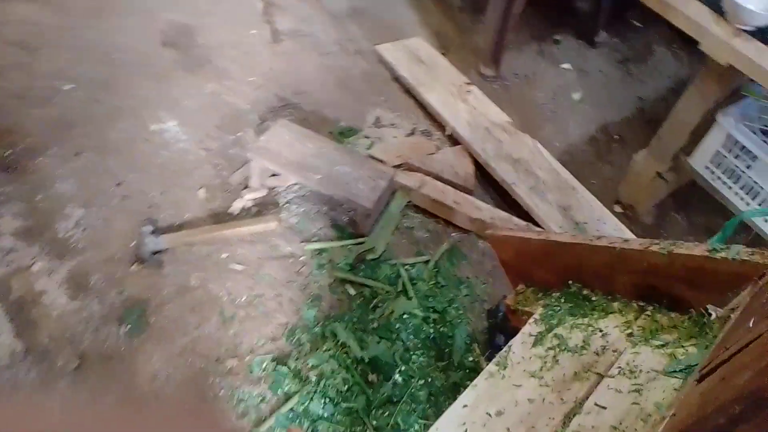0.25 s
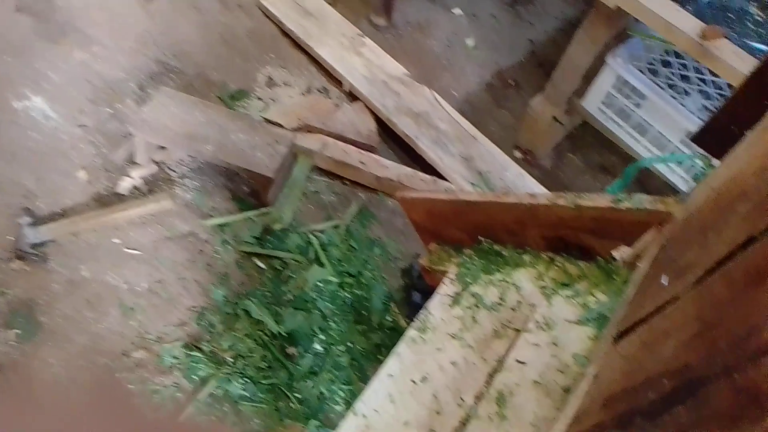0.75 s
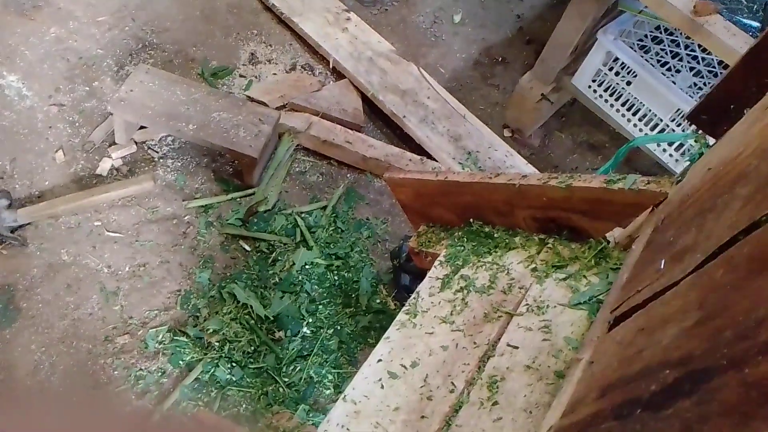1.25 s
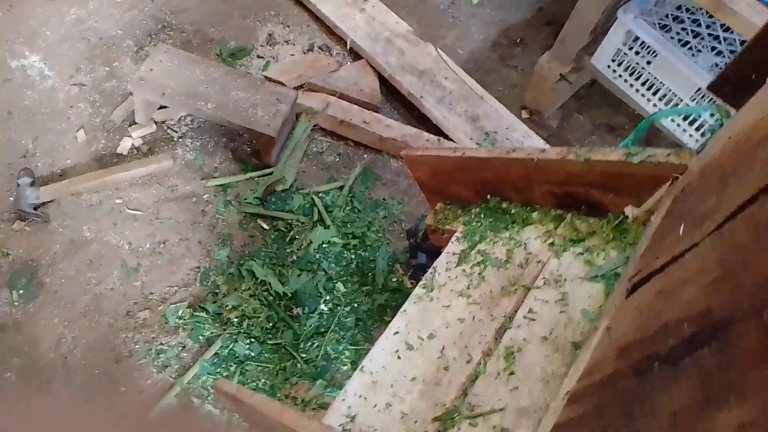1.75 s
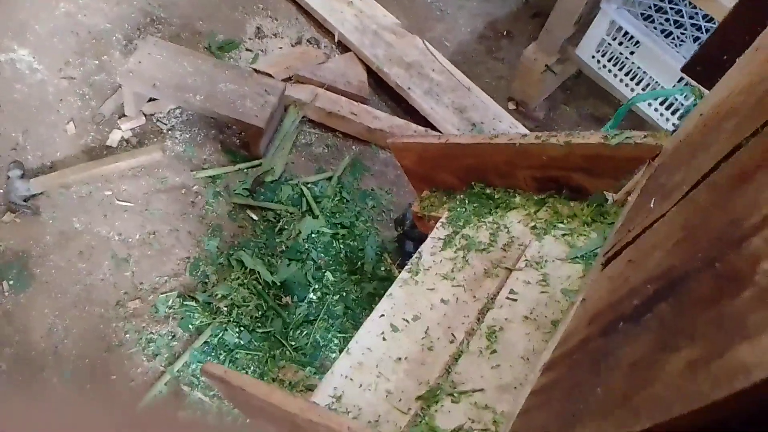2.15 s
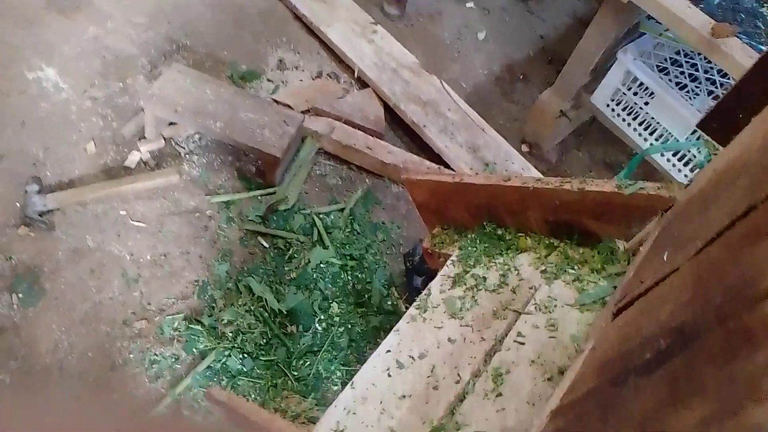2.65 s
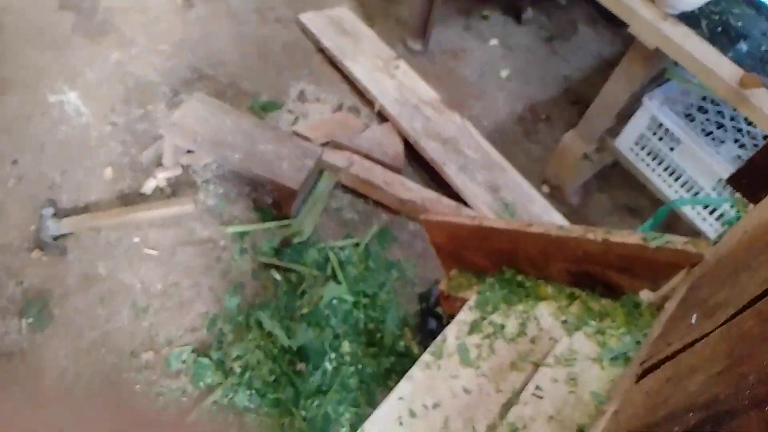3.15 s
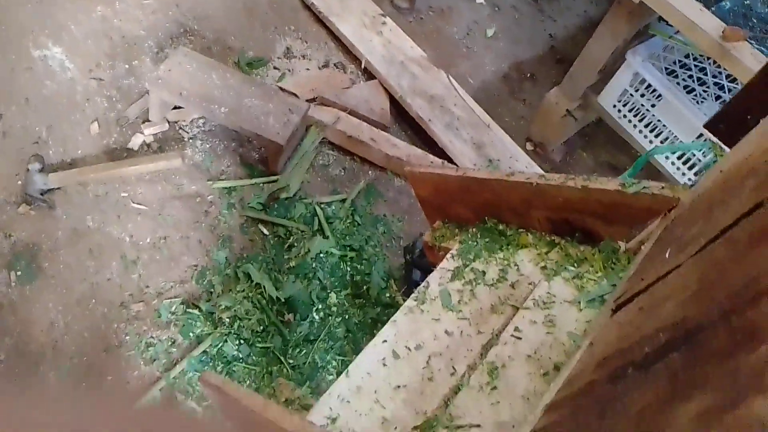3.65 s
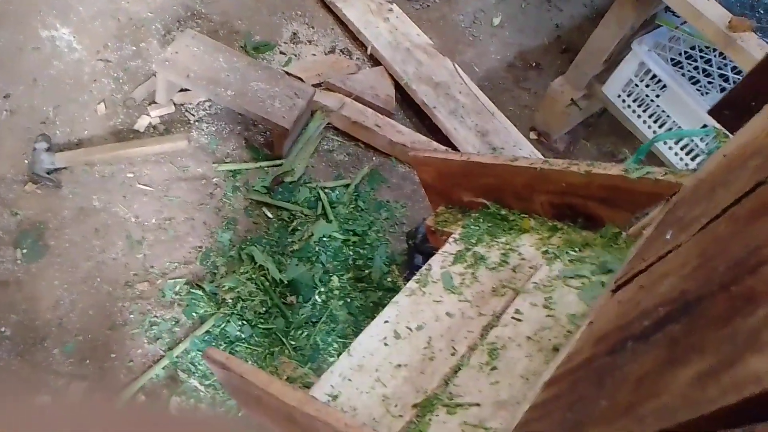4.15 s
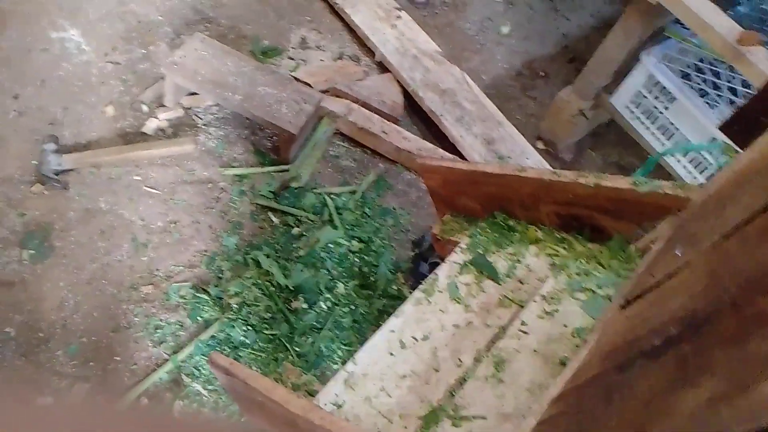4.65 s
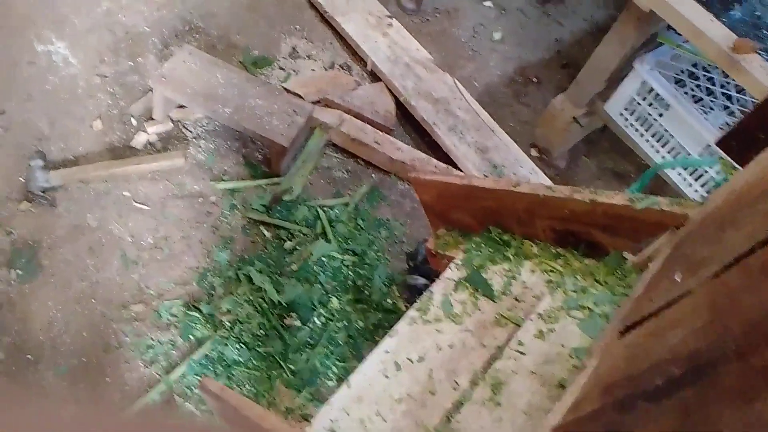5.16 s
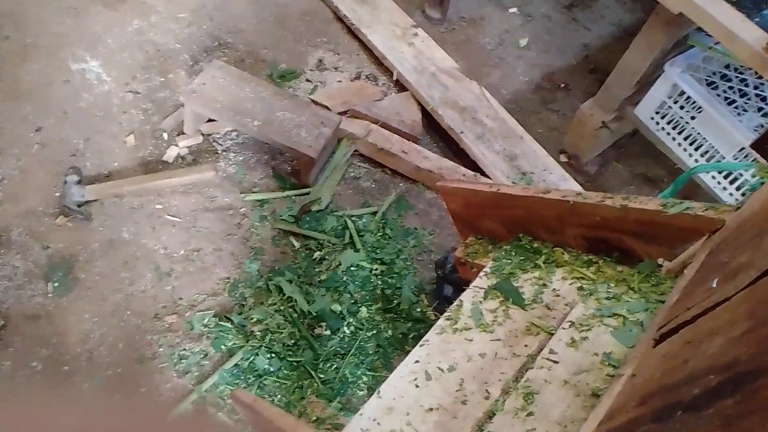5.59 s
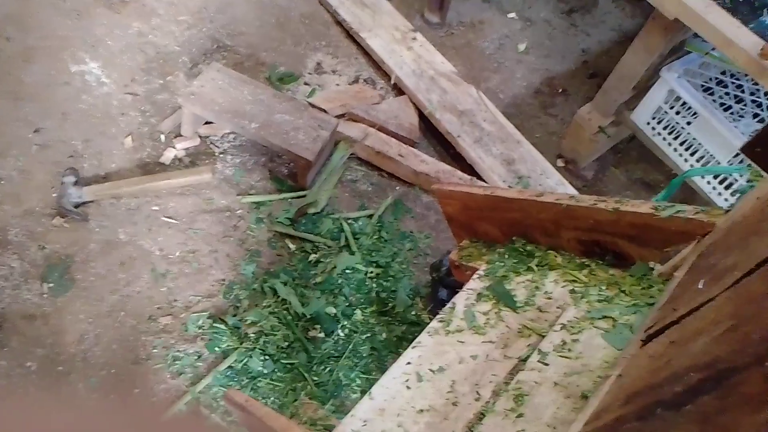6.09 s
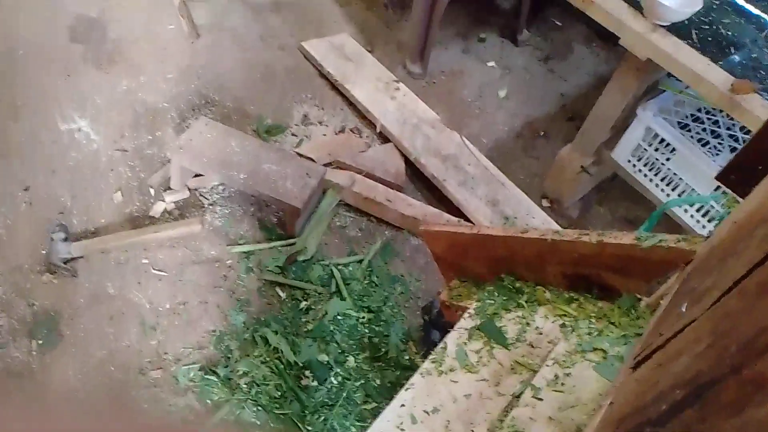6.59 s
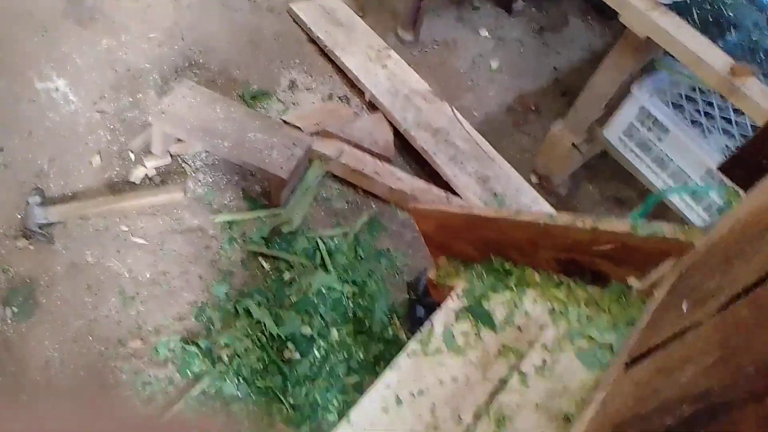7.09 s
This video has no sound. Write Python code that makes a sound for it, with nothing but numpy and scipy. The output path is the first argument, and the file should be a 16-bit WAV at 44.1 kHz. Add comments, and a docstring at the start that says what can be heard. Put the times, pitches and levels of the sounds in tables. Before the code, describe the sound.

A continuous, harsh machine noise heard from very near: mains hum, fluttering blade whirr and boxy housing rattle. Each push of green stalks slows the motor slightly and makes it growl, while leaves rip with a bright hiss. The disc sings in piercing, shifting metallic notes, with crunchy snaps between. Feeding eases late, then resumes until the end, without the machine stopping.

```python
"""A homemade chopper's steel blade shreds handfuls of green fodder, heard close by in a farm shed.
An induction motor spins it about 49 times a second: hum, rotor tones and growl, slowing as stalks push in.
Once a turn the cut shakes the housing, rasps on the steel and tears the leaves, all as shaped noise.
Rubbing sets the blade's own notes singing; thick stalks snap and chips click as decaying noise bursts."""
import sys
import numpy as np
from scipy import signal
from scipy.fft import rfft, irfft, next_fast_len
from scipy.io import wavfile
from scipy.ndimage import uniform_filter1d, minimum_filter1d, map_coordinates

SR = 44100
rng = np.random.default_rng(int(sys.argv[2]) if len(sys.argv) > 2 else 0)


def pcm_store(signal):
    """Save signal as 16-bit PCM."""
    levels = np.round(np.clip(np.atleast_2d(signal), -1, 1) * 32767)
    wavfile.write(sys.argv[1], SR, levels.astype(np.int16).T)


N = 323253
T = np.arange(N) / SR  # s

# stalks pushed against the blade [start t/s, end t/s, speed lost/turns per s, growl level/dB]
PUSHES = [(.49, 1.403, 0.27, -40), (1.39, 1.504, 1.36, -29), (1.501, 1.719, 0.36, -39),
          (2.02, 2.28, 1.44, -27), (2.299, 3.153, .26, -31.5), (3.36, 3.58, 1.25, -30.5),
          (3.58, 3.85, 1.5, -28.5), (3.85, 4.2, .68, -27.5), (4.2, 4.621, .92, -30),
          (4.62, 4.849, 0.36, -34.5), (5.13, 5.326, .35, -25.5), (5.33, 6.03, .95, -43),
          (6.749, 6.859, 1.35, -37), (6.86, 7.402, 0.7, -40)]
FREE_SPEED = 49.43  # turns per s
INERTIA_S, IDLE_GROWL_DB = .065, -42  # lag of slowing and recovery; growl between pushes

# mains hum of the motor [f/Hz, level/dB before ducking]
HUM = [(100, -49.5), (200, -46.5)]
# tones that come up when the rotor runs free [multiple of shaft speed, level/dB before ducking]
FREE_TONES = [(2, -62), (5, -50), (6, -32)]
# rotor's own tone [multiple of shaft speed, level/dB before load and throb]
ROTOR = [(4, -45)]
# throb of the rotor's own tone [t/s, depth 0-1]
THROB = [(4.6, 0.03), (4.75, 0.53), (5.3, 0.6), (5.6, 0.17), (6.1, 0.21), (6.6, 0.47), (6.8, 0.08)]
# growl under load [multiple of shaft speed, level/dB against the growl strength]
GROWL = [(6, -16.5), (7, -9.5), (8, -5.5), (9, -6), (11, -14.5), (20, -5), (21, -3), (23, -3.5), (26, -12)]
ROTOR_LOAD_GAIN = 35  # the rotor's tone grows with the growl

# handfuls of leaves going through [start t/s, end t/s, rasp level/dB, tearing level/dB, before thinning]
HANDFULS = [(.36, 1.268, -21.5, -27), (1.283, 1.482, -17.5, -25), (1.612, 1.98, -21, -31),
            (2.044, 2.295, -20, -31), (2.37, 2.54, -14.5, -33), (2.56, 2.961, -18, -36.5),
            (3.04, 3.332, -19, -28), (3.389, 3.631, -20, -31), (3.65, 3.774, -11.5, -27),
            (3.86, 4.08, -16, -25), (4.116, 4.551, -21, -29), (4.681, 4.98, -23, -33.5),
            (5.088, 5.38, -18.5, -25.5), (5.4, 6.056, -21.5, -28), (6.199, 6.276, -34, -33.5),
            (6.64, 7.4, -24, -27)]
# a handful is caught quickly and thins out as it is cut
FEED_ATTACK_S, FEED_RELEASE_S, THINNING_DB_PER_S = 0.017, 0.093, 3
IDLE_RASP_DB, IDLE_TEAR_DB = -25, -34.5  # scraps left in the housing
PACKED_DB = -8.5  # whine and shriek together at which the feed counts as packed tight
# a loose feed: share of the cut in one bite a turn, and change from turn to turn; each layer scales them
BITE_SHARE, LOOSENESS = 0.43, 0.74

# spectrum of the shaken housing [f/Hz, relative level/dB]
HOUSING_COLOUR = [(20, -61), (150, -24.5), (240, -14.5), (330, -8.5), (560, -3.5), (760, -4.5), (880, -4),
                  (940, -1), (1025, 6.5), (1170, -4), (1400, -6.5), (1650, -2.5), (2100, -8), (4000, -40)]
# housing: level before ducking, dip while the blade sings loudest, dB per dB of tearing
HOUSING_DB, HOUSING_DUCKING_DB, HOUSING_FOLLOWS = -20.5, 8, 0.28
NORMAL_TEAR_DB = -29.5  # tearing of an ordinary handful
# spectrum of the rasp on steel [f/Hz, relative level/dB]
RASP_COLOUR = [(60, -31.5), (800, -24.5), (1250, -9.5), (1900, -4), (2400, 4), (2600, 0), (2850, 1),
               (3100, 0), (3520, -1.5), (3900, -5.5), (4500, -43), (7000, -46)]
# spectrum of the tearing leaves [f/Hz, relative level/dB]
TEAR_COLOUR = [(2500, -44), (3700, -3), (4400, 2), (5300, -1), (6500, -8.5), (7200, -13), (9000, -13.5),
               (10500, -19), (13000, -34), (15500, -20)]
# the edge ticking against a stalk once a turn [t/s, level/dB]
TICK = [(0, -35.5), (.85, -31.5), (1.1, -26), (1.3, -29.5), (1.55, -32), (1.68, -25), (1.97, -26),
        (2.08, -46)]
# spectrum of the tick [f/Hz, relative level/dB]
TICK_COLOUR = [(2000, -21), (3500, -0.5), (4200, 3), (5200, -30), (9000, -19.0), (15000, -31.5)]
# the disc whirring when little touches it [t/s, level/dB]
WHIRR = [(0, -24), (.35, -23.5), (1.3, -32), (1.55, -59), (5.9, -37), (6.05, -26.5), (6.55, -25),
         (6.75, -33)]
# spectrum of the whirr [f/Hz, relative level/dB]
WHIRR_COLOUR = [(2200, -46), (2700, 1.5), (2900, 0.5), (3150, -4.0), (3700, -43)]
# spectrum of the flying chips [f/Hz, relative level/dB]
CHIP_COLOUR = [(1000, -3.5), (5000, -1), (9000, -9.0), (14000, -21)]

# notes of the steel, by name
# [f/Hz, width/Hz, self-sustained share 0-1, lower side tone, upper side tone, phase swing/rad]
BLADE = {"moan": (871.3, 6.1, 0.28, 0.2, .1, 0.043), "hoot": (1279, 12, 0.41, 0.34, 0.35, 0.28),
         "whine": (1752, 16, 0.3, 0.23, 0.15, 0.25), "squeal": (2394, 9, 0.53, 0.46, -0.28, 0.5),
         "shriek": (2795, 17, 0.5, 1.5, 0.3, 0.4), "whistle": (3256, 5, 0.6, 0.21, 0.047, 0.26),
         "ping": (4360, 5, .5, 0.2, 0.2, 0.7), "sizzle": (4700.5, 8.6, 0.7, 0.69, -0.3, 1),
         "zing": (5500, 22, 0.33, 0.33, .1, 1)}
# overtones of the blade, ringing along with the tearing [f/Hz, level/dB against the steady contact]
OVERTONES = [(3412, -4), (3545, -4.5), (4550, -12.5), (5093, -16), (5400, -14.5), (6110, -15), (6500, -17),
             (6700, -18.5)]
# rubs that set a note singing; the hardest wins [note, start t/s, end t/s, level/dB before fading]
RUBS = [("moan", 0.57, 1.35, -26.5), ("moan", 3.38, 3.6, -29.5), ("moan", 3.9, 4.68, -24),
        ("moan", 6.75, 7.3, -30), ("hoot", 1.27, 1.85, -32), ("hoot", 1.926, 2.12, -24.5),
        ("hoot", 2.39, 3.05, -25.5), ("hoot", 3.2, 3.55, -29), ("hoot", 5.12, 5.38, -26.5),
        ("whine", 0.45, 0.55, -18), ("whine", 1.266, 1.65, -17), ("whine", 1.6, 1.9, -23),
        ("whine", 1.887, 2.28, -14.5), ("whine", 2.08, 2.17, -7.5), ("whine", 2.26, 2.73, -8.5),
        ("whine", 2.75, 3.53, -15), ("whine", 3.19, 3.33, -10.5), ("whine", 3.58, 3.95, -23),
        ("whine", 4.03, 4.7, -15.5), ("whine", 4.72, 4.9, -19.5), ("whine", 4.93, 4.99, -22),
        ("whine", 5.06, 5.16, -16.5), ("whine", 5.27, 5.98, -15.5), ("whine", 6.65, 6.73, -17.5),
        ("whine", 6.785, 7.4, -14.5), ("squeal", 2.43, 2.54, -22), ("squeal", 2.75, 3.06, -21.5),
        ("squeal", 3.31, 3.42, -18.5), ("squeal", 3.6, 3.85, -16), ("squeal", 3.9, 4.0, -16.5),
        ("squeal", 4.0, 4.9, -25.5), ("squeal", 5.1, 5.36, -22.5), ("squeal", 5.56, 5.98, -21),
        ("squeal", 6.66, 6.79, -13), ("squeal", 6.86, 7.16, -17.5), ("shriek", 2.05, 2.12, -23),
        ("shriek", 2.62, 3.0, -21), ("shriek", 2.72, 2.83, -11.5), ("whistle", 3.9, 4.9, -25.5),
        ("whistle", 4.26, 4.42, -21), ("whistle", 5.1, 5.32, -26), ("whistle", 5.55, 5.72, -23.5),
        ("whistle", 5.95, 6.3, -22), ("whistle", 6.3, 6.52, -30.5), ("whistle", 6.66, 7.4, -25.5),
        ("ping", 6.78, 6.95, -28), ("sizzle", 5.94, 6.14, -25.5), ("sizzle", 6.14, 6.34, -31),
        ("zing", 5.16, 5.28, -28)]
# a note builds up fast and rings on briefly
RUB_ATTACK_S, RUB_RELEASE_S, RUB_FADE_DB_PER_S = 0.019, 0.039, 1.5
# notes the leaves keep alive between rubs, by name [level/dB against the tearing]
GRAZE_DB = {"moan": -5.5, "whine": -1, "squeal": -12, "whistle": -6, "ping": -10.5}

# thick stalks snapping [t/s, level/dB, decay/s]
SNAPS = [(1.287, -23, 0.023), (2.21, -27, 0.032), (2.395, -30, .02), (3.328, -26, 0.02),
         (3.578, -16, 0.023), (3.825, -21, .01), (5.115, -19, 0.022), (6.019, -30, 0.024),
         (6.669, -23, .03)]
# spectrum of the snap [f/Hz, relative level/dB]
CRUNCH_COLOUR = [(150, -16), (350, 1), (1500, -12.0), (3600, 9.0), (6000, 3.0), (8000, -14), (14000, -28)]


def gain_of(db):
    """Decibels to amplitude."""
    return 10 ** (np.asarray(db) / 20)


def evened(x):
    """Scales to unit rms."""
    return x / np.sqrt(np.mean(abs(x) ** 2) + 1e-20)


def steadied(x, size=3600):
    """Scales to unit rms from moment to moment, leaving the flutter within a turn."""
    power = uniform_filter1d(uniform_filter1d(abs(x) ** 2, size), size // 2)
    return x / np.sqrt(abs(power) + 1e-20)


def curve(rows):
    """A table of (t/s, value) drawn out to every sample."""
    return np.interp(T, *np.transpose(rows))


def coloured(x, points):
    """Filters by a spectrum drawn on a log-frequency axis."""
    size = next_fast_len(N + 4096)
    hz, db = np.transpose(points)
    log_hz = np.log(np.fft.rfftfreq(size, 1 / SR) + 1)
    gain = gain_of(np.interp(log_hz, np.log(hz), db))
    return irfft(rfft(x, size) * gain, size)[:N]


def wavering(per_s, depth_db):
    """A gain that drifts at random, about per_s times a second."""
    knots = rng.standard_normal(600)
    return evened(gain_of(depth_db * np.interp(T * per_s, np.arange(len(knots)), knots)))


def held(start, end, attack, release, fade_db_per_s):
    """Envelope that rises at start, fades slowly while held and dies away after end."""
    since = np.clip(T - start, 0, max(end - start, .01))
    rise = 1 - np.exp(-since / attack)
    die_away = np.exp(-np.maximum(T - end, 0) / release)
    return rise * gain_of(-fade_db_per_s * since) * die_away


def decaying(hits, decay_s):
    """Gives every hit an exponential tail."""
    return signal.lfilter([1], [1, -np.exp(-1 / (decay_s * SR))], hits)


def shaft():
    """Each push brakes the rotor and makes it growl; inertia smooths both. Returns speed lost and growl strength."""
    sag, growl = np.zeros(N), np.full(N, gain_of(IDLE_GROWL_DB))
    for start, end, lost, db in PUSHES:
        pushing = (T >= start) & (T < end)
        sag[pushing], growl[pushing] = lost, gain_of(db)
    keep = np.exp(-1 / (INERTIA_S * SR))
    return signal.lfilter([1 - keep], [1, -keep], [sag, growl])


def sine(cycles):
    """A unit-rms sine with a random starting phase."""
    return np.sqrt(2) * np.sin(2 * np.pi * (cycles + rng.random()))


def orders(turns, table, waver_db):
    """Sines locked to the shaft, each drifting in strength."""
    return sum(gain_of(db) * wavering(7, waver_db) * sine(k * turns) for k, db in table)


def motor(turns, sag, growling, loose):
    """Mains hum beats against the rotor's tones and fades while the machine is loud; under load a growl takes over."""
    hum = sum(gain_of(db) * sine(hz * T) for hz, db in HUM)
    ducking = 1.16 * gain_of(-10 * sag) * (0.14 + 0.74 * loose)
    load_gain = 1 + ROTOR_LOAD_GAIN * growling
    throb = 1 + curve(THROB) * np.sin(2 * np.pi * 8.3 * T)  # 8.3 Hz
    rotor = orders(turns, ROTOR, waver_db=2.5) * load_gain * throb
    growl = growling * orders(turns, GROWL, waver_db=3.5)
    return rotor + growl + ducking * (hum + orders(turns, FREE_TONES, waver_db=3.5))


def feed():
    """Strength of the rasp and of the tearing as handful follows handful, added as power."""
    rasp_power, tear_power = gain_of(IDLE_RASP_DB) ** 2, gain_of(IDLE_TEAR_DB) ** 2
    for start, end, rasp_db, tear_db in HANDFULS:
        shape = held(start, end, FEED_ATTACK_S, FEED_RELEASE_S, THINNING_DB_PER_S)
        rasp_power = rasp_power + (gain_of(rasp_db) * shape) ** 2
        tear_power = tear_power + (gain_of(tear_db) * shape) ** 2
    return np.sqrt(rasp_power), np.sqrt(tear_power)


def repeating(turns, memory, fresh, size=2048):
    """Roughness met again on every turn: it wears away over `memory` turns, and a share is always new."""
    keep = np.exp(-1 / memory)
    # one row a turn, each a worn copy of the last; the first 50 rows let it settle
    track = signal.lfilter([1], [1, -keep], rng.standard_normal((420, size // 2)), axis=0)[50:]
    track = signal.resample_poly(track.ravel(), up=2, down=1)
    old = map_coordinates(track, [turns * size], order=1)
    return np.sqrt(1 - fresh) * evened(old) + np.sqrt(fresh) * rng.standard_normal(N)


def bites(turns, depth, angle, length, uneven_db):
    """Envelope of the cut: a burst as the edge meets the feed, of a different size each turn."""
    since = turns - angle + 1  # angle and length in turns
    phase = since % 1
    size = gain_of(uneven_db * rng.uniform(-2.0, 2.3, 400))[since.astype(int)]
    burst = evened(size * np.exp(-phase / length) * (1 - np.exp(-phase / 0.011)))
    return np.sqrt(1 - depth + depth * burst ** 2)


def housing(turns, tearing, packed, bite, loose):
    """The cut shakes the wooden housing into a drone, which dips while the blade sings loudly."""
    level = gain_of(HOUSING_DB - HOUSING_DUCKING_DB * packed)
    level = level * (tearing / gain_of(NORMAL_TEAR_DB)) ** HOUSING_FOLLOWS
    drone = repeating(turns, memory=22.0, fresh=0.17 + .5 * loose)
    drone = drone * bites(turns, depth=0.59 * bite, angle=0.38, length=0.38, uneven_db=4)
    return level * wavering(18, depth_db=1) * steadied(coloured(drone, HOUSING_COLOUR))


def rasp(turns, rasping, bite, loose):
    """Leaves scrape over the steel, with roughness that returns on every turn."""
    scrape = repeating(turns, memory=28, fresh=.34 * loose)
    scrape = scrape * bites(turns, depth=.7 * bite, angle=.36, length=.18, uneven_db=2)
    return rasping * wavering(20, depth_db=2.5) * steadied(coloured(scrape, RASP_COLOUR))


def crackle(per_s, decay, size_db):
    """Envelope of single fibres parting: sudden, of different sizes, quickly gone."""
    breaks = (rng.random(N) < per_s / SR) * gain_of(size_db * np.minimum(rng.exponential(1, N), 3))
    return evened(1 + .5 * decaying(breaks, decay))


def tear(turns, tearing, bite, loose):
    """Leaves tear in bites, roughened by single fibres parting."""
    rip = repeating(turns, memory=24, fresh=.5 * loose)
    rip = rip * bites(turns, depth=1.05 * bite, angle=0.37, length=0.2, uneven_db=2)
    fibres = crackle(per_s=200, decay=0.002, size_db=0.5)
    return tearing * wavering(19, depth_db=2.0) * steadied(coloured(rip * fibres, TEAR_COLOUR))


def tick(turns):
    """The edge ticks against a stalk in a short burst once a turn."""
    edge = repeating(turns, memory=30, fresh=.1) * bites(turns, depth=1, angle=.39, length=.1, uneven_db=1.5)
    return gain_of(curve(TICK)) * evened(coloured(edge, TICK_COLOUR))


def whirr(turns):
    """The disc whirrs in a narrow band of noise, partly repeating each turn."""
    rough = repeating(turns, memory=20, fresh=0.7)
    return gain_of(curve(WHIRR)) * evened(coloured(rough, WHIRR_COLOUR))


def cutting(turns, rasping, tearing, packed, bite, loose):
    """All layers of the cut; a packed feed makes housing, rasp and tearing repeat more exactly."""
    return (housing(turns, tearing, packed, bite, loose) + rasp(turns, rasping, bite, loose)
            + tear(turns, tearing, bite, loose) + tick(turns) + whirr(turns))


def chips(tearing):
    """Flying chips click against the boards, about 45 a second, louder with the tearing."""
    hits = (rng.random(N) < 45 / SR) * rng.exponential(1, N)
    clicks = decaying(hits, 0.0033) * rng.standard_normal(N)
    return gain_of(-13.5) * tearing * evened(coloured(clicks, CHIP_COLOUR))


def singing(tearing):
    """Strength of each note of the steel: that of the hardest rub, or the faint graze of the leaves."""
    strength = {note: gain_of(db) * tearing for note, db in GRAZE_DB.items()}
    for note, start, end, db in RUBS:
        rub = gain_of(db) * held(start, end, RUB_ATTACK_S, RUB_RELEASE_S, RUB_FADE_DB_PER_S)
        strength[note] = np.maximum(strength.get(note, 0), rub)
    return strength


def ringing(turns, hz, width, sustained, lower, upper, swing):
    """One note of the disc, kicked once a turn and rubbed; lobes sweep past twice a turn, giving side tones."""
    carrier = np.exp(2j * np.pi * hz * T)
    r = np.exp(-np.pi * width / SR)  # a wider note decays faster
    kick = evened(np.exp(-(((turns - .88) % 1 - .01) / 0.0019) ** 2))
    rub_colour = [(hz * .4, -45), (hz * .72, 0), (hz, 0), (hz * 1.0, -6), (hz * 2, -45)]
    rub = coloured(kick + .5 * rng.standard_normal(N), rub_colour)
    # resonate around zero frequency, then shift up with the carrier
    resonance = signal.lfilter([1 - r], [1, -r], rub / carrier)
    build = np.hanning(150)  # the ring takes a moment to spread round the disc
    struck = evened(signal.oaconvolve(resonance, build, "same"))
    steady = np.exp(2j * np.pi * rng.random())
    ring = steadied(sustained * steady + (1 - sustained) * struck, size=1800)
    sweep = np.exp(4j * np.pi * (turns - .55))
    phase_swing = np.exp(1j * swing * (sweep ** 2).imag)
    lobes = evened((1 + lower / sweep + upper * sweep) * phase_swing)
    return np.sqrt(2) * (ring * lobes * carrier).real


def blade(turns, strength, tearing, bite):
    """The main notes swell and fade as the stalks press on the disc; overtones come and go with the tearing."""
    out = sum(strength[name] * wavering(14, depth_db=1.4) * ringing(turns, *note)
              for name, note in BLADE.items())
    contact = tearing * (1.6 - 2.07 * bite)  # a sharp bite leaves less steady rubbing
    for hz, db in OVERTONES:
        tone = ringing(turns, hz, width=6.4, sustained=0.54, lower=0.3, upper=-0.085, swing=0.7)
        out += gain_of(db) * contact * wavering(8, depth_db=4) * tone
    return out


def snaps():
    """A thick stalk bursts in a short, bright crunch."""
    envelope = np.zeros(N)
    for s, db, decay in SNAPS:
        envelope += gain_of(db) * (T >= s) * np.exp(-abs(T - s) / decay)
    return envelope * evened(coloured(rng.standard_normal(N), CRUNCH_COLOUR))


def scene():
    """The one shaft's angle times every turn; the tighter the feed is packed, the smoother the cut."""
    sag, growling = shaft()
    turns = np.cumsum(FREE_SPEED - sag) / SR
    rasping, tearing = feed()
    strength = singing(tearing)
    loud_notes = uniform_filter1d(strength["whine"] + strength["shriek"], size=6000)
    packed = np.clip(loud_notes / gain_of(PACKED_DB), 0, 1)  # loud singing stands for a tight feed
    bite, loose = BITE_SHARE * (1 - packed), LOOSENESS * (1 - packed)
    mix = motor(turns, sag, growling, loose) + cutting(turns, rasping, tearing, packed, bite, loose)
    mix = mix + chips(tearing) + blade(turns, strength, tearing, bite) + snaps()
    return mix[None]


def record(dry):
    """A fast limiter holds the peaks down to about -4 dB; then a steep low-pass at 15.8 kHz."""
    headroom = np.minimum(1, gain_of(-4) / (abs(dry) + 1e-9))
    limited = dry * uniform_filter1d(minimum_filter1d(headroom, size=200), size=200)
    low_pass = signal.firwin(511, 15800, window=("kaiser", 9), fs=SR)
    return signal.oaconvolve(limited, low_pass[None], "same")


dry = scene()
out = record(dry)
pcm_store(out)
```